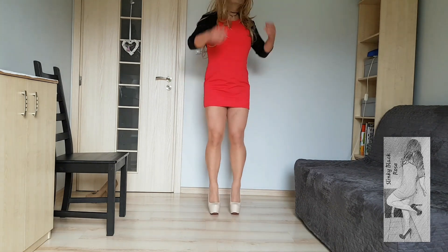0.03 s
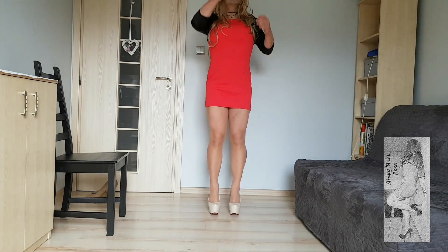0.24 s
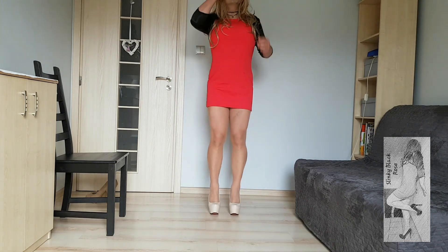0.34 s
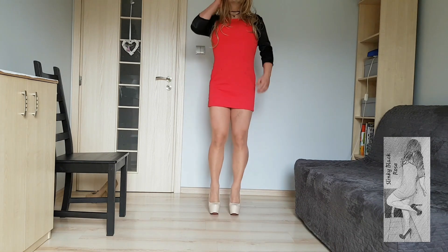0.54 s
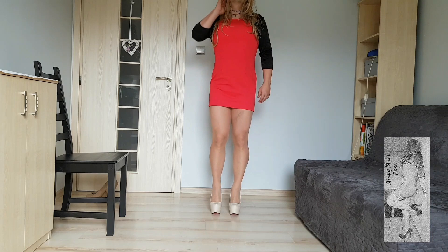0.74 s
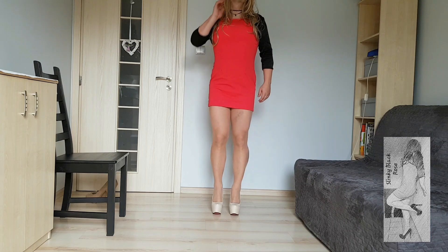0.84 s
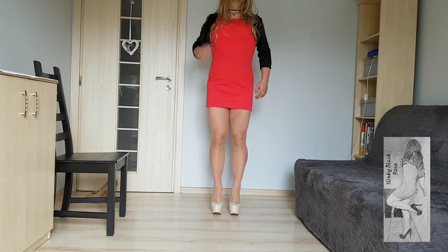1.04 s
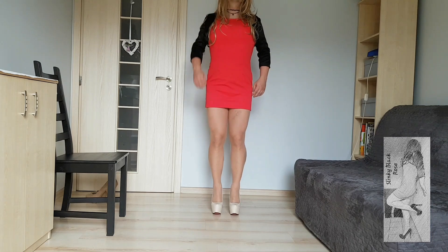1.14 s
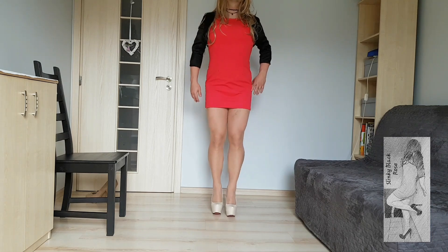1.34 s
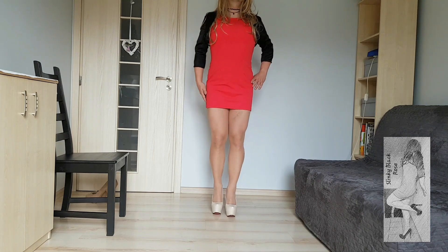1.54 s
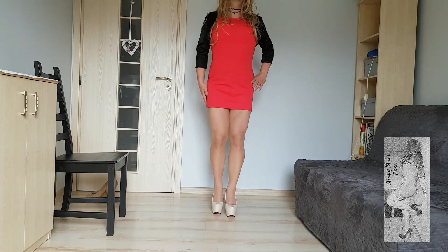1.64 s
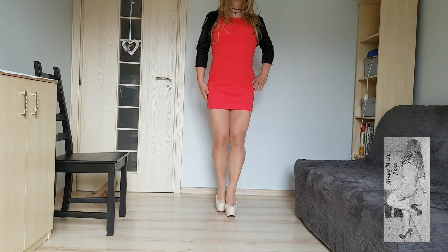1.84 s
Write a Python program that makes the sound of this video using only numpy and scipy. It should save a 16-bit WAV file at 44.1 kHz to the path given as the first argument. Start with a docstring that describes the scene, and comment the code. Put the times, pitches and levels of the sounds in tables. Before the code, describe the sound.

High-heeled shoes shift in place on laminate, a few metres from the microphone. A firm, hollow knock comes first, then quiet scuffs and taps, then a lighter heel-and-sole step. Each knock rings briefly in the small room over faint hiss.

```python
"""A light tap and a scuff, then one firm step: high heels on a laminate floor, a few metres away.
Soft taps follow as the weight shifts, then a lighter heel-and-sole step; the soles scuff in between.
Each contact knocks the floorboards. The knock bounces off the near walls and sets the small,
furnished room ringing. A faint hiss lies under it all."""
import sys
import numpy as np
from scipy import signal
from scipy.fft import rfft, irfft, next_fast_len
from scipy.io import wavfile

SR = 44100
rng = np.random.default_rng(int(sys.argv[2]) if len(sys.argv) > 2 else 0)


def master_out(mix):
    """Clip the mix to full scale and print it as 16-bit PCM to the path in sys.argv[1]."""
    frames = np.transpose(np.atleast_2d(mix))
    ceiling = np.clip(frames, -1, 1)
    pcm = np.round(ceiling * 32767).astype(np.int16)
    wavfile.write(sys.argv[1], SR, pcm)


N = 81585


def amp(db):
    """Turn decibels into a number to multiply a sound by."""
    return 10 ** (np.asarray(db) / 20)


def unit_level(sound):
    """Scale a sound so that its average (RMS) level is 1."""
    return sound / np.sqrt(np.mean(sound ** 2) + 1e-20)


def curve_at(points, hz):
    """Read a curve of (frequency, value) points, giving each octave about equal space."""
    frequencies, values = np.transpose(points)
    return np.interp(np.log(hz + 1), np.log(frequencies + 1), values)


def filtered(sound, response):
    """Multiply each frequency in a sound by response(hz)."""
    n = sound.shape[-1]
    padded = next_fast_len(n + SR // 2)
    hz = np.fft.rfftfreq(padded, 1 / SR)
    return irfft(rfft(sound, padded) * response(hz), padded)[..., :n]


def shortest_pulse(level_db, size=4096):
    """The most sudden pulse whose tone follows level_db(hz)."""
    hz = np.fft.rfftfreq(size, 1 / SR)
    cepstrum = irfft(np.log(amp(level_db(hz))))
    fold = np.r_[1, np.full(size // 2 - 1, 2), np.zeros(size // 2)]  # no sound before the hit
    return irfft(np.exp(rfft(cepstrum * fold)))


# How alike left and right are: (frequency [Hz], likeness [0 to 1])
STEREO_LIKENESS = [(60, 0.73), (250, 0.74), (600, 0.6), (1200, 0.23), (2500, 0.076), (12000, 0.018)]
def diffuse_noise(n):
    """Noise from all around: left and right are alike in the bass, unrelated in the treble."""
    def shares(hz):
        angle = np.arccos(np.clip(curve_at(STEREO_LIKENESS, hz), -1, 1)) / 2
        return np.array([np.cos(angle), np.sin(angle)])
    mid, side = filtered(rng.standard_normal((2, n)), shares)
    return np.array([mid + side, mid - side])


# Tone of the quiet room: (frequency [Hz], relative level [dB])
HISS_TONE = [(12, 11), (28, -11.5), (55, -1), (110, -4), (200, -5.5), (350, 1), (520, -5), (760, -9.5),
             (1150, -9.5), (1800, -12), (2800, -16.5), (4600, -21.5), (7500, -25.5), (9800, -31),
             (11500, -24), (14400, -24)]
def room_hiss(level_db=-62):
    """Steady room noise and microphone hiss."""
    hiss = filtered(diffuse_noise(N), lambda hz: amp(curve_at(HISS_TONE, hz)))
    return amp(level_db) * unit_level(hiss)


# Tone of the room's wash of echoes: (frequency [Hz], relative level [dB])
REVERB_TONE = [(100, 5), (200, -7), (500, -4), (850, -5.5), (1400, -1.5), (2500, 1.5), (12000, -2.5)]
# How long it lasts: (frequency [Hz], time to fade by 60 dB [s])
REVERB_FADE = [(120, 0.23), (400, 0.4), (1000, 0.44), (3000, 0.44), (12000, .33)]
def reverberation(rise_s=0.0012):
    """Countless echoes blur into a tail; each frequency dies at its own speed."""
    hz, t, spectrum = signal.stft(diffuse_noise(SR), SR, nperseg=256)
    fade = amp(-60 * t / curve_at(REVERB_FADE, hz)[:, None])
    tail = signal.istft(spectrum * fade, SR, nperseg=256)[1][:, :SR]
    tail = filtered(tail, lambda f: amp(curve_at(REVERB_TONE, f))) / np.linalg.norm(tail[0])
    return tail * (1 - np.exp(-np.arange(SR) / SR / rise_s))


# Notes of the room and floor: (pitch [Hz], relative level [dB], time to fade by 60 dB [s])
ROOM_NOTES = [(83, -44, 0.23), (139, -46, 0.21), (173.96, -49.5, 0.42), (201.5, -53.5, 0.34),
              (241.8, -71, 0.99), (273.1, -62.5, 0.45), (325.2, -65, 0.47), (361, -61.5, 0.52),
              (441, -60.5, 0.53), (515, -60.5, 0.48), (534.6, -59, 0.25), (680.4, -47, 0.16),
              (754, -52.5, 0.23), (807.6, -55.5, 0.17), (840.3, -50, 0.16), (1059.6, -59.5, 0.25),
              (1172, -55, 0.39), (1265, -50, 0.2), (3019, -49.5, 0.47)]
def standing_waves(rise_s=0.018):
    """Waves trapped in the room and floor build up and ring on."""
    t = np.arange(SR) / SR
    ring = sum(amp(db + rng.normal(0, 1, (2, 1)) - 60 * t / fade_s) * np.cos(2 * np.pi * hz * t)
               for hz, db, fade_s in ROOM_NOTES)
    return ring * (1 - np.exp(-t / rise_s))


# Bounces off near walls and furniture: (delay [s], relative level [dB], left side's head start [s])
WALL_ECHOES = [(.0038, -8, .0002), (.0056, -15, .0003), (.0091, -19.5, 0), (0.0127, -13.5, 0),
               (0.0149, -15.5, -.0002), (0.0342, -20, 0)]
def early_paths(direct_db=-13, scatter_hz=2520):
    """The direct sound and first echoes; they lose treble as it scatters into the room."""
    def response(hz):
        sides = np.array([[-.5], [.5]])
        echoes = sum(amp(db) * np.exp(-2j * np.pi * hz * (delay + sides * lead))
                     for delay, db, lead in WALL_ECHOES)
        return (amp(direct_db) + echoes) / (1 + 1j * hz / scatter_hz)
    return filtered(signal.unit_impulse(SR), response)


# The parts of a shoe's sound, from low to high.
THUD_HZ, KNOCK_HZ, CLACK_HZ, CLICK_HZ, SIZZLE_HZ = 208, 648, 1750, 4590, 12000

# Tone of a rubbing sole: (frequency [Hz], relative level [dB])
RUB_TONE = [(100, -13.5), (300, 0), (700, -5.5), (1100, 2), (1600, -4.5), (2400, -10.5), (4500, -20),
            (8000, -30.5), (14000, -32)]
# Slides of the sole: (start [s], rise [s], fall [s], level [dB], treble boost [dB])
SLIDES = [(0.021, 0.025, 0.11, -61.5, 2), (0.318, .13, .15, -54.5, 9.5), (1.19, .11, 0.09, -64, -9),
          (1.649, 0.078, 0.21, -52, -5.5), (1.811, .03, 0.027, -55.5, 1)]
def sole_scuffs(catches_per_s=450, roughness_db=1):
    """A sliding sole swells and fades; tiny catches on the floor roughen the rub."""
    t, out = np.arange(N) / SR, np.zeros((2, N))
    for start, rise, fall, db, treble_db in SLIDES:
        catches = np.interp(t * catches_per_s, np.arange(N), rng.standard_normal(N))
        rough_noise = diffuse_noise(N) * amp(roughness_db * catches)
        treble = [(CLACK_HZ, 0), (SIZZLE_HZ, treble_db)]
        rub = filtered(rough_noise, lambda hz: amp(curve_at(RUB_TONE, hz) + curve_at(treble, hz)))
        swell = np.interp(t, [start, start + rise, start + rise + fall], [0, 1, 0])
        out += unit_level(rub) * amp(db) * swell
    return out


# Tone of a shoe hitting the boards: (frequency [Hz], relative level [dB])
KNOCK_TONE = [(30, -41), (85, -33), (150, -14), (240, -10.5), (340, -5.5), (520, -7), (780, -12),
              (1100, -18), (1600, -28.5), (2800, -32.5), (4600, -29.5), (7500, -42), (11500, -38),
              (14500, -36)]
# Where the boards and shoe ring: (pitch [Hz], half width [Hz], boost [dB])
BOARD_RINGS = [(310, 52, 4.5), (504.7, 36, 5), (702.6, 48, 5.5), (827, 35, 8.5), (1011, 34, 8),
               (1314, 99, 3.5)]
def board_knock(strength_db, colour, hollow_hz, hollow_db=5.5, hollow_octaves=0.18):
    """A shoe knocks the boards; each spot on the floor favours one hollow pitch."""
    def level_db(hz):
        rings = sum(db / (1 + ((hz - pitch) / width) ** 2) for pitch, width, db in BOARD_RINGS)
        octaves_away = np.log2((hz + 1) / hollow_hz)
        hollow = hollow_db / (1 + (octaves_away / hollow_octaves) ** 2)
        return strength_db + curve_at(KNOCK_TONE, hz) + rings + curve_at(colour, hz) + hollow
    return -shortest_pulse(level_db)  # minus: the boards are pushed down


# Each touch of a heel or sole: (time [s], strength [dB], room ring [dB], hollow pitch [Hz],
# thud boost [dB], clack boost [dB], click boost [dB], sizzle boost [dB])
SHOE_CONTACTS = [(.0215, -5.5, -4, 322, 3, 18, 5, -2), (.2135, -2, 6.5, 394, 7, 4, 8, 1),
                 (.2262, 21, 1.5, 346, -1, 1, 0.5, -4), (.239, 19.5, -6.5, 520, -3.5, -4.5, -11, 2),
                 (0.2574, 7.5, 0.5, 800, 16.5, -1, -1, -1), (0.2917, 7, -12, 213, 9, -7, -1, 10),
                 (.680, -3.5, -3, 1090, -7.5, 20, 7.5, 3.5), (.8566, -9, 7, 737, -11, -16, -7, -7),
                 (.897, -3.5, -3, 650, -6, -9, -3, 0), (.9495, -6, 0, 616, 6, 0, -6, -20),
                 (.9925, -8.5, -4, 425, -2, 8, 6, 3), (1.2529, -10.5, -2.5, 356, 11, 5, -9, 8),
                 (1.277, -9.5, -7, 1020, -23, -2, 9.5, 2), (1.3035, -6.5, -5.5, 1240, 9, 19, 4.5, 8),
                 (1.471, 9, -2, 550, 5, 10, -2.5, -13), (1.499, -11, 6.5, 127, 11, 3, 8.5, 4),
                 (1.5594, 5.5, -2, 333, 3, -2, -19, -14), (1.5665, 9.5, -1, 970, -1, 3.5, -10, -9),
                 (1.821, -5, -4.5, 1049, -2, 12, 8, 8)]
def footsteps():
    """Each contact makes a knock of its own colour, which sounds through the room."""
    out = np.zeros((2, N + 2 * SR))
    near, ring = early_paths(), standing_waves()
    for time, strength_db, room_db, hollow_hz, thud, clack, click, sizzle in SHOE_CONTACTS:
        colour = [(THUD_HZ, thud), (KNOCK_HZ, 0), (CLACK_HZ, clack),
                  (CLICK_HZ, click), (SIZZLE_HZ, sizzle)]
        knock = board_knock(strength_db, colour, hollow_hz)
        room = near + amp(room_db) * (ring + reverberation())
        heard = signal.fftconvolve(room, knock[None], axes=1)
        start = round(time * SR)
        out[:, start:start + heard.shape[1]] += heard
    return out[:, :N]


# Tone of the two microphone openings: (frequency [Hz], left minus right level [dB])
MIC_BALANCE = [(250, -0.5), (600, 0.1), (1100, 0.2), (2000, 1), (4000, 3.7), (7500, -2.5), (9500, -15),
               (12000, 2.5)]
def scene():
    """Steps and scuffs, coloured by each microphone opening, over the quiet room."""
    shoes = footsteps() + sole_scuffs()
    sides = np.array([[.5], [-.5]])
    return filtered(shoes, lambda hz: amp(curve_at(MIC_BALANCE, hz) * sides)) + room_hiss()


def record(dry, top_hz=14560):
    """The very highest treble is cut away."""
    return filtered(dry, lambda hz: hz < top_hz)


dry = scene()
out = record(dry)
master_out(out)
```